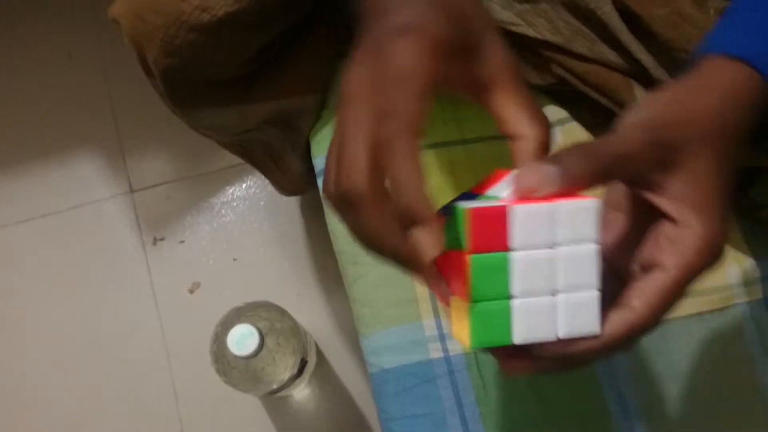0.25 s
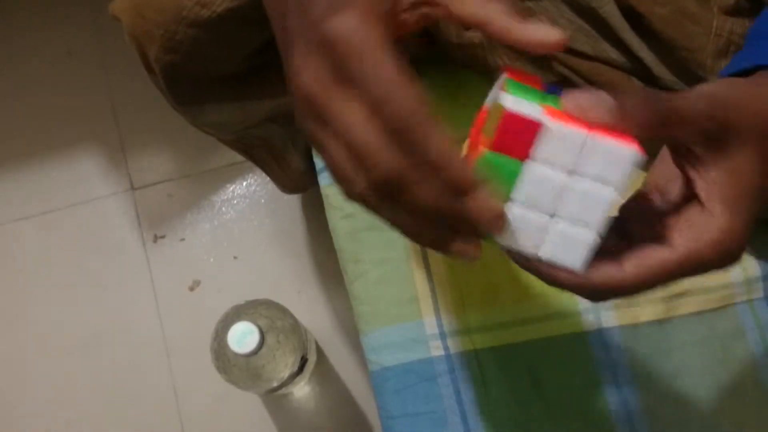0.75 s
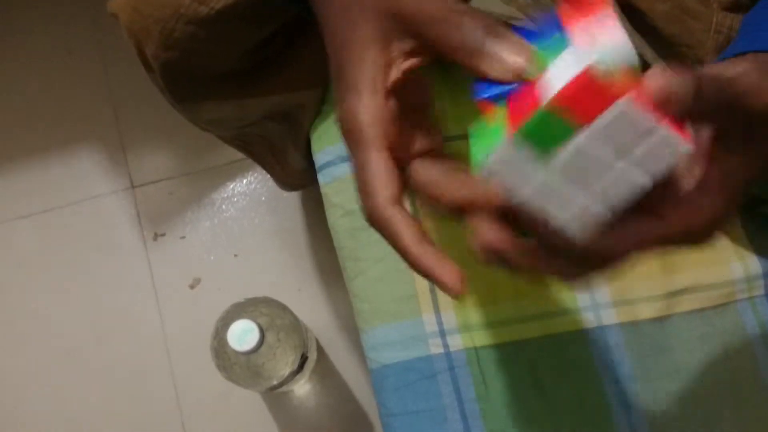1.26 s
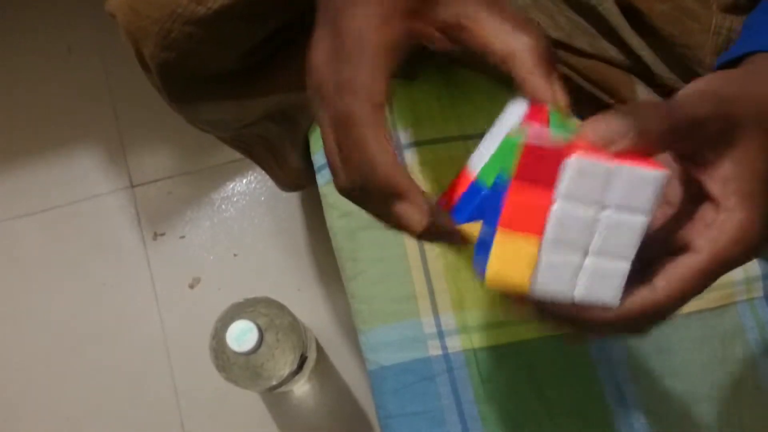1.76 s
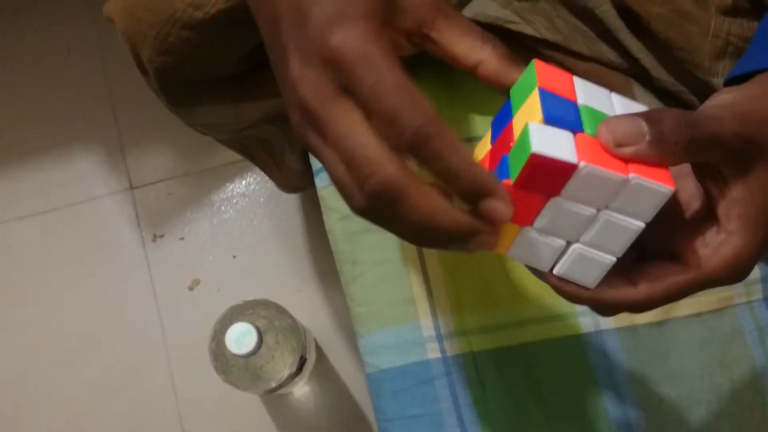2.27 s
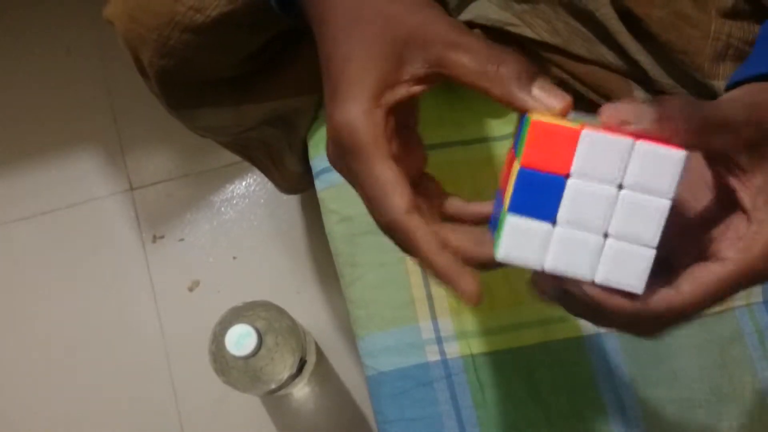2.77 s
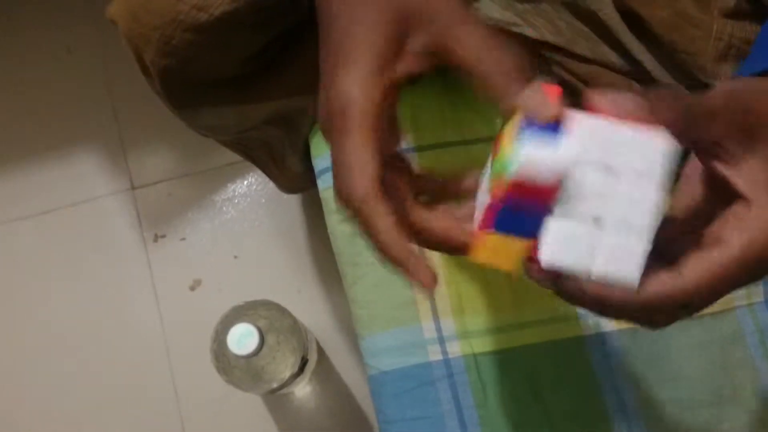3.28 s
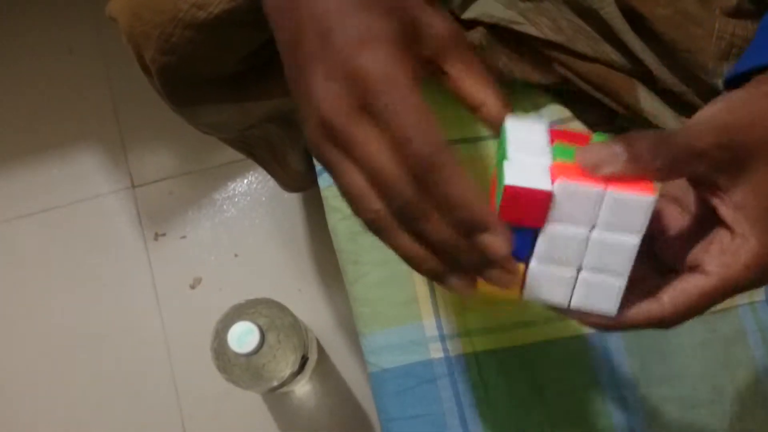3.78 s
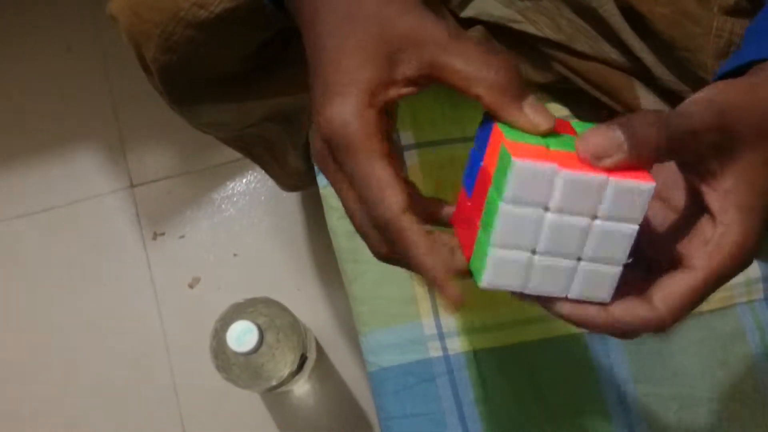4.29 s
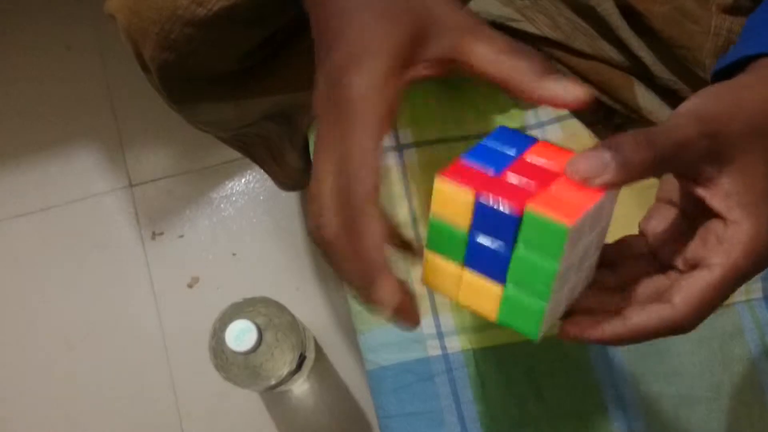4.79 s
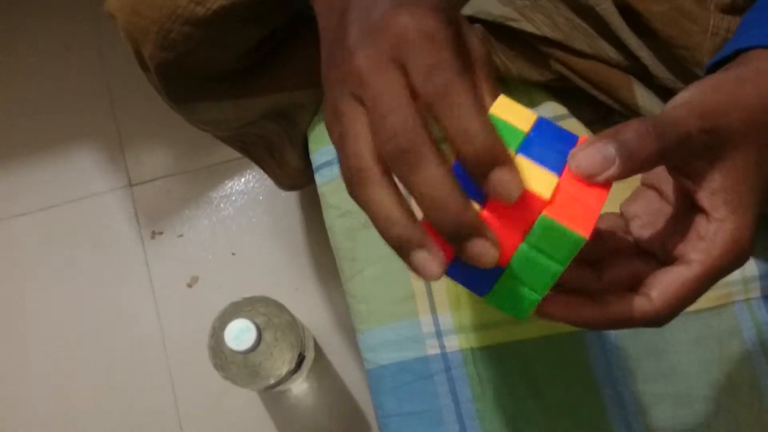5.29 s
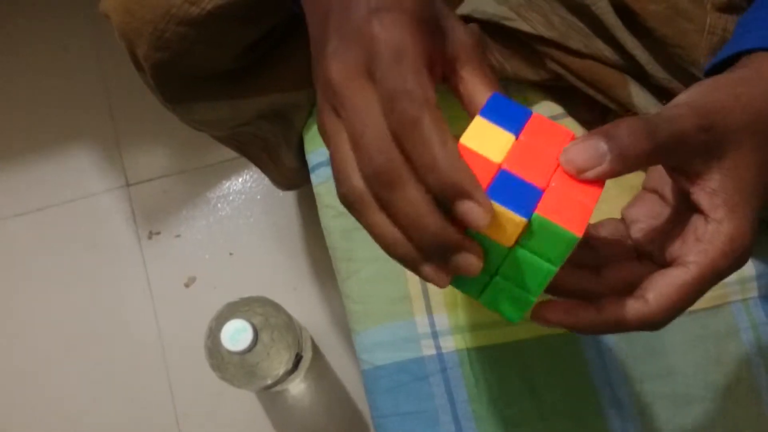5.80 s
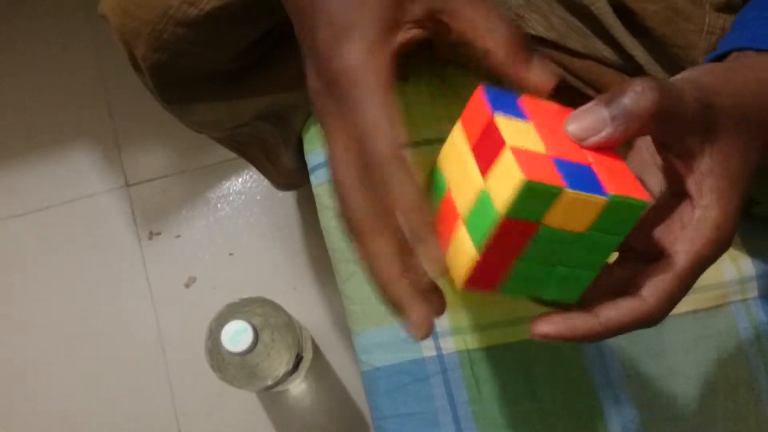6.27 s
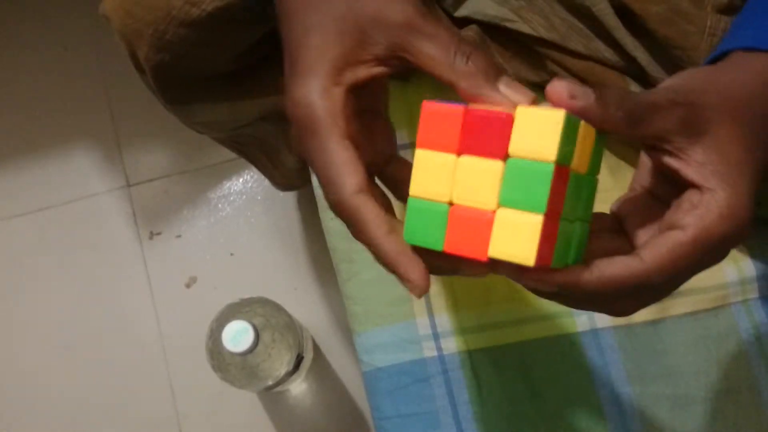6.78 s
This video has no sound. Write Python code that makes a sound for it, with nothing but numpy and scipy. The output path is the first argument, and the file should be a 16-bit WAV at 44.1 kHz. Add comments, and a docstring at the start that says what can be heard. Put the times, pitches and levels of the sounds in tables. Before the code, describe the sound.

A plastic puzzle cube is twisted quickly by hand up close, with dry rasps, irregular light clicks and two sharp louder clacks in a small room.

```python
"""In a small tiled room, a plastic puzzle cube is twisted quickly by hand, close to the microphone.
Its layers rasp as they slide: banded noise roughened by chance grains. The hollow pieces tick, catch
and twice snap into line with a loud clack: noise cracks with short rings, echoed by a decaying noise tail.
A low hum of three wavering partials swells and fades over the room's rumble of filtered noise,
and a few soft bumps, heavily damped sines, reach the microphone."""
import sys
import numpy as np
from scipy import signal
from scipy.io import wavfile

SR = 44100
rng = np.random.default_rng(int(sys.argv[2]) if len(sys.argv) > 2 else 0)


def master(y):
    """Save y as 16-bit WAV."""
    cut = np.clip(np.atleast_2d(y).T, -1, 1)
    pcm = np.round(cut * 32767)  # scale
    wavfile.write(sys.argv[1], SR, pcm.astype(np.int16))


N = 310464
TIME = np.arange(N) / SR

# pushes on a layer, free-running bright and pressed dull:
# start_s, length_s, level_db (before the rasp trim), tilt_db_per_octave
LAYER_PUSHES = [(0.0, 0.02, -53, 1), (0.1, 0.22, -62.5, 1.5), (0.275, 0.14, -51, 1.5),
                (0.49, 0.044, -64, -1), (0.65, 0.038, -60.5, 4.5), (0.72, 0.041, -53.5, 0.5),
                (0.991, .1, -49.5, 1.3), (1.252, 0.042, -61.5, -3), (1.323, .06, -48, -1),
                (1.479, .025, -60, 3), (1.72, 0.032, -52.5, 3), (1.76, .045, -46.5, 1.2),
                (1.928, .08, -48, 1.5), (2.148, .02, -56.5, 0), (2.225, 0.042, -53, 0),
                (2.39, 0.13, -54, -0.1), (2.633, .025, -37.5, 0), (2.866, .035, -54.5, 0),
                (2.955, 0.041, -43, -.2), (3.125, 0.051, -59, .5), (3.332, 0.054, -49, .3),
                (3.385, .06, -42.5, 0.8), (3.535, .085, -50, .7), (3.70, 0.018, -58.5, 0),
                (3.86, 0.16, -47, -2), (4.615, 0.045, -52, .9), (4.675, .045, -47.5, .9),
                (4.825, 0.0086, -56.5, 0), (5.043, .05, -47, 1), (5.32, 0.11, -62, 0),
                (5.63, 0.044, -58, .7), (5.69, 0.022, -46, .7), (6.14, 0.13, -64.5, 0),
                (6.46, .04, -59.5, -1), (6.69, .09, -64.5, -1.3)]
GRIP_DB = -72.5   # fingers brush the smooth faces all the time; before the rasp trim


def from_db(db):
    """Decibels to gain."""
    return 10 ** (np.asarray(db) / 20)


def rms_one(x):
    """Scale to unit power."""
    return x / np.sqrt(np.mean(x ** 2) + 1e-20)


def at_hz(points, hz):
    """Read a table on a log-frequency axis."""
    freqs, values = np.transpose(points)
    return np.interp(np.log(hz), np.log(freqs), values)


def butter(x, hz, kind, order=2):
    """Causal Butterworth filter."""
    return signal.sosfilt(signal.butter(order, hz, kind, fs=SR, output="sos"), x)


def pan(left_db):
    """Gains of the two channels, left_db apart."""
    return from_db(np.array([[left_db], [-left_db]]) / 2)


def drift(rate):
    """Slow chance: straight lines between random points, rate of them per second."""
    knots = rng.standard_normal(int(rate * N / SR) + 2)
    return np.interp(TIME * rate, np.arange(len(knots)), knots)


def add(out, s, sound):
    """Mix a stereo sound in at time s."""
    start = max(round(s * SR), 0)
    out[:, start:start + sound.shape[1]] += sound[:, :N - start]


def noise_bands(size, low_hz):
    """Roughly half-octave bands of stereo noise, most alike left and right in the bass: (Hz, band)."""
    # likeness of the two channels: pitch_hz, correlation (0 to 1)
    likeness = [(30, 1), (200, 0.51), (600, 0), (1500, 0.01), (4000, 0), (16000, 0.32)]
    edges = np.geomspace(low_hz, 17000, int(2 * np.log2(17000 / low_hz)) + 1)
    white = rng.standard_normal((2, 2, size))
    for k, (low, high) in enumerate(zip(edges, edges[1:])):
        mid, side = butter(white[k % 2], [low, high], "band")
        hz = np.sqrt(low * high)
        alike = np.clip(at_hz(likeness, hz), -1, 1)
        yield hz, np.sqrt(1 + alike) * mid + np.sqrt(1 - alike) * side * [[1], [-1]]


def air(air_db=-67, sway_db=-47, sway_hz=11):
    """Steady room noise, and the deep sway of a hand-held microphone."""
    # colour of the still room: pitch_hz, relative level_db_per_hz
    air_colour = [(20, -9.5), (40, -11.5), (80, -16.5), (130, -20), (210, -22), (300, -26), (420, -27.5),
                  (600, -34), (1000, -38), (2000, -40), (4000, -47), (8000, -57), (16000, -49.5)]
    # its stereo balance: pitch_hz, left_right_db
    air_balance = [(25, -26.5), (100, -3.5), (250, -0.5), (5000, -2), (8500, -11), (16000, -9.5)]
    noise = 0
    for hz, band in noise_bands(N, 20):
        noise = noise + from_db(at_hz(air_colour, hz)) * pan(at_hz(air_balance, hz)) * band
    # air_db sets the level above the rumble
    noise = noise / np.std(butter(noise.mean(axis=0), 150, "high", order=4))
    sway = rms_one(butter(rng.standard_normal(N), sway_hz, "low", order=3))
    return from_db(air_db) * noise + from_db(sway_db) * sway * pan(-11.5)


def hum(centre_hz=63, hum_db=-1, waver=0.022):
    """A low hum that wavers in pitch as it swells and fades."""
    # swells of the hum: time_s, level_db (before the hum_db trim)
    hum_swells = [(0.0, -49.5), (0.13, -58.5), (0.28, -48), (0.62, -55.5), (1.05, -73), (1.55, -54),
                  (1.66, -72), (1.82, -56), (2.05, -66.5), (2.39, -47), (2.72, -68.5), (3.9, -60.5),
                  (4.16, -48), (4.33, -57.5), (4.52, -52), (4.7, -62), (5.15, -59.5), (5.25, -43),
                  (5.42, -45), (5.65, -60), (6.6, -66.5), (6.76, -55), (7.04, -43)]
    # partials: multiple of the hum's pitch, relative level_db
    hum_partials = [(1, 9), (2, -13), (3, -16)]
    pitch_hz = centre_hz * (1 + waver * drift(3.5))
    phase = 2 * np.pi * np.cumsum(pitch_hz) / SR
    tone = sum(from_db(db) * np.sin(round(k) * phase) for k, db in hum_partials)
    level_db = np.interp(TIME, *np.transpose(hum_swells)) + hum_db
    return from_db(level_db) * rms_one(tone) * pan(-7.5)


def sliding(attack_s=0.0091, release_s=0.022, grip_tilt_db=1):
    """Level and tilt of the rasp: a layer gathers speed, holds over its travel, then is braked."""
    power, tilted = 0, 0
    for start, length, db, tilt in LAYER_PUSHES:
        early = np.maximum(start - TIME, 0)
        late = np.maximum(TIME - start - length, 0)
        swell = np.exp(-np.minimum(early / attack_s + late / release_s, 20))
        push = (from_db(db) * swell) ** 2
        power, tilted = power + push, tilted + tilt * push
    grip = from_db(GRIP_DB) ** 2
    # the loudest push or grip decides the tilt, in dB per octave
    return np.sqrt(power), (tilted + grip_tilt_db * grip) / (power + grip)


def rasp(rasp_db=-4.5, judder_db=2.5, left_db=3.0, slips_per_s=520, slip_spread_db=4.0):
    """Sliding plastic sticks and slips in many tiny grains over the smooth hiss of the fingers."""
    # colour of the rasp: pitch_hz, relative level_db_per_hz
    rasp_colour = [(300, -21.5), (600, -7), (900, -0.5), (1600, 3), (2400, 3), (3500, 3), (6000, -2.5),
                   (9000, -2), (12000, 4), (16000, 1)]
    level, tilt = sliding()
    level = level * from_db(judder_db * drift(70))
    slips = rng.random(N) < slips_per_s / SR
    slips = slips * from_db(slip_spread_db * np.minimum(rng.exponential(1, N), 3))
    grains = rms_one(butter(slips + 1e-18, 200, "low", order=1))
    grit = rms_one(grains + .4)   # a steady part fills in between the grains
    hiss = 0
    for hz, band in noise_bands(N, 300):
        hiss = hiss + from_db(at_hz(rasp_colour, hz) + tilt * np.log2(hz / 5000)) * band
    return from_db(rasp_db) * (level * grit + from_db(GRIP_DB)) * rms_one(hiss) * pan(left_db)


def loose_ticks(count=2, tick_db=-2.5, spread_db=2.5, hollow_db=-6.5, top_db=-1):
    """Loose pieces tick at chance moments of each push: start_s, level_db, hollow_db, top_db."""
    ticks = []
    for start, length, db, _ in LAYER_PUSHES:
        for _ in range(count):
            when = start + length * rng.random()
            level_db = db + tick_db + spread_db * rng.standard_normal()
            ticks.append((when, level_db, hollow_db, top_db))
    return ticks


def knock(crack_s=0.001, rise_s=0.00014, far_crack_s=0.0015, far_rise_s=0.0035, far_db=0,
          scatter_db=-20, scatter_s=0.012, vary_db=3.0, detune=0.05):
    """One contact: a crack, its scatter between the hands, and a short ring varied for piece size."""
    # rings of hollow plastic damped by the hands, before variation: pitch_hz, level_db, t60_s
    cube_modes = [(915, -19.5, 0.023), (1018, -23, 0.014), (1350, -21, .018), (1626, -17, 0.022),
                  (2140, -21, 0.025), (2900, -26, 0.018), (3736, -25, 0.043), (4620, -17, 0.0084),
                  (5376, -16.5, 0.013), (6290, -15, 0.01), (8100, -16, 0.0034), (8400, -12.5, 0.0041),
                  (9430, -10, 0.0061)]
    t = np.arange(SR // 25) / SR
    near = np.exp(-t / crack_s)
    # the right port faces away
    far = from_db(far_db) * np.exp(-t / far_crack_s) * (1 - np.exp(-t / far_rise_s))
    scatter = from_db(scatter_db) * np.exp(-t / scatter_s)
    sound = rng.standard_normal((2, len(t))) * (np.array([near, far]) + scatter)
    chances = rng.standard_normal((len(cube_modes), 3))
    for (hz, db, t60), (strength, size, lag) in zip(cube_modes, chances):
        ear_time = t - np.array([[0], [lag * .00007]])
        phase = 2 * np.pi * hz * (1 + detune * size) * ear_time
        decay = from_db(db + vary_db * strength - 60 * t / t60)
        sound += decay * np.sin(phase + rng.uniform(0, 2 * np.pi))
    return sound * (1 - np.exp(-t / rise_s))


def clicks(knock_db=-2, hollow_db=0, top_db=-3.0, slip_db=-17, slip_s=0.0021, across=0.31):
    """A piece scuffs, then lands; where it meets its neighbour sets its share of hollow body and sharp top."""
    # pieces knocking together, all levels before the trims above:
    # start_s, level_db of the onset, hollow_db and top_db (relative to the middle band)
    piece_knocks = [(0.174, -46, -2, 8), (0.268, -45.5, -3, -2), (0.294, -39, -11, 13), (0.308, -42, 3, 37),
                    (0.349, -44, -11, 3.5), (0.498, -45, -11, 9.5), (0.530, -49, -8, 1),
                    (0.567, -51.5, -9, 5), (0.889, -48.5, -12, 0), (0.980, -40.5, -10.5, 3),
                    (0.999, -39, -7, 2), (1.009, -43.5, -2.5, -15), (1.0609, -28, -12.5, 2.5),
                    (1.169, -53, -4, 1), (1.257, -42.5, -20, 11.5), (1.315, -43.5, -1, 8),
                    (1.3525, -33, -14, 6), (1.3646, -37, -6, 7), (1.3695, -36, -15, 6.5),
                    (1.473, -55.5, -5.5, -1), (1.594, -47, -4.5, 2.5), (1.681, -42.5, -18, 8),
                    (1.7067, -51, -6, 2), (1.900, -33.5, -8, 15), (1.9322, -28.5, -15.5, 6),
                    (2.064, -47, -9, 4), (2.0901, -43.5, -6, 6), (2.205, -38.5, -15.5, 3.5),
                    (2.264, -67, -11, 16), (2.368, -42, -9, 4.5), (2.380, -33, -15, 11.5),
                    (2.404, -38, -16, 5.5), (2.424, -41, -6, 12), (2.456, -47, -7, -3),
                    (2.476, -37.5, -10, 5.5), (2.569, -38, -13, 9.5), (2.585, -36.5, -17, 6),
                    (2.609, -14, -15.5, 4.5), (2.6247, -25, -18, 10), (2.632, -12.5, -8.5, 11.5),
                    (2.6345, -12, -9, 7.5), (2.646, -10, -11.5, 8.5), (2.6498, -19, -26, 1),
                    (2.860, -49, -15, -2), (2.921, -45, -22, 7), (2.956, -39.5, -4, -2),
                    (2.9803, -27.5, -16, 7), (2.9999, -32, 3.5, 16), (3.087, -43, -10, 6.5),
                    (3.295, -39.5, -6.5, 4.5), (3.3484, -33.5, -5.5, 0.5), (3.400, -35.5, -20, 1),
                    (3.4283, -28, -15, 7), (3.4512, -26.5, -9.5, 8), (3.498, -45, -5, 22),
                    (3.5318, -41.5, -11, 1), (3.548, -44, -7, -16), (3.715, -50, -19, 12),
                    (3.774, -48, -7, 4.5), (3.839, -48, -9, 5), (3.844, -36, -12, 7),
                    (3.866, -41, -25, -11), (3.874, -38, -13, 1), (3.9272, -26, -13.5, 6.5),
                    (3.9301, -23, -18, 15), (3.94, -24.5, -13, 2), (3.9513, -18.5, -20, 4.5),
                    (3.9522, -20.5, -37, 2), (4.020, -38, -5, 12), (4.128, -55.5, -15, -5),
                    (4.172, -50.5, -6, 3), (4.213, -47, -1.5, 7.5), (4.256, -49.5, -11, 3),
                    (4.317, -45, -14, 3), (4.364, -53, -1, 10), (4.397, -48.5, -11, -2),
                    (4.417, -39.5, -13.5, 7.5), (4.58, -50, -10, -5), (4.616, -45, -1.5, -7),
                    (4.694, -36, -7.5, 2.5), (4.818, -47.5, -15.5, 4), (5.007, -45.5, -10, 2.5),
                    (5.0303, -43.5, -24, 4), (5.061, -31.5, -11.5, -10), (5.0967, -26, -9, 2.5),
                    (5.275, -51, -12, 4.5), (5.309, -46.5, -10, 6.5), (5.394, -44.5, -13, 1.5),
                    (5.625, -49, -7, 2.5), (5.64, -45.5, -11, 0), (5.7027, -29, -10.5, 6.5),
                    (5.920, -47.5, -20, 14), (5.945, -54, -11, 0.5), (6.0927, -56, -6, 2),
                    (6.142, -52.5, -15, 5), (6.161, -51, -12, 0), (6.193, -42.5, -9.5, 7.5),
                    (6.239, -44, -18, 2), (6.260, -47.5, -12, 0.5), (6.356, -44.5, -10, 8),
                    (6.379, -49, -9, 6), (6.460, -48, -7, 5), (6.529, -48, -6.5, 4),
                    (6.576, -42.5, -14, 11), (6.634, -50.5, -14, 4), (6.672, -46, -9, 2.5),
                    (6.711, -54.5, -12, 3), (6.7545, -49, -18, 3.5), (6.803, -48.5, -12.5, 0),
                    (6.984, -47, -12, 2.5), (6.994, -44.5, -8, 4.5)]
    out = np.zeros((2, N))
    lead = np.arange(-SR // 150, 0) / SR
    for s, db, hollow, top in piece_knocks + loose_ticks():
        scuff = from_db(slip_db) * np.exp(lead / slip_s) * rng.standard_normal((2, len(lead)))
        contact = np.hstack([scuff, knock()])
        body = butter(contact, [650, 2400], "band", order=3)
        middle = butter(contact, [2700, 7200], "band", order=3)
        edge = butter(contact, [7000, 16500], "band", order=3)
        body = body + across * body[::-1]   # long waves reach both ports more alike
        sound = from_db(hollow + hollow_db) * rms_one(body) + rms_one(middle)
        sound = sound + from_db(top + top_db) * rms_one(edge)
        onset = sound[:, len(lead):len(lead) + SR // 440]
        onset_level = np.sqrt(np.mean(onset ** 2))
        add(out, s + lead[0], sound / onset_level * from_db(db + knock_db))
    return out


def body_thud(knocks, thud_db=-13, low_hz=190, high_hz=800):
    """Knocks also shake the whole cube in the hand: low noise follows their loudness."""
    shake = np.sqrt(np.abs(butter(knocks.mean(axis=0) ** 2, 60, "low", order=1)))
    return from_db(thud_db) * butter(shake * rng.standard_normal(N), [low_hz, high_hz], "band")


def room(x, wet_db=-10.0, first_s=0.0047, build_s=0.0036, left_db=-5.5, lumpy_db=5.5):
    """Reflections build up unevenly from the floor and walls, then die away, the top soonest."""
    # colour of the reverberation: pitch_hz, relative level_db_per_hz
    room_colour = [(300, -0.5), (1000, 3), (3000, 0.5), (4500, 7.5), (6000, 4.5), (8500, 1.5), (15000, 7.5)]
    # its decay: pitch_hz, t60_s
    room_decay = [(500, 0.1), (1500, 0.27), (4000, 0.21), (9000, 0.19), (15000, 0.07)]
    t = np.arange(SR // 2) / SR
    tail = 0
    for hz, band in noise_bands(len(t), 140):
        tail = tail + band * from_db(at_hz(room_colour, hz) - 60 * t / at_hz(room_decay, hz))
    build = np.clip((t - first_s) / build_s, 0, 1)
    tail = tail * build * from_db(lumpy_db * drift(700)[:len(t)])
    tail = tail / np.sqrt(np.sum(tail ** 2) / 2)
    return from_db(wet_db) * signal.fftconvolve(x, tail, axes=1)[:, :N] * pan(left_db)


def port(x, resonances):
    """A microphone port lifts and hollows parts of the treble with peaking filters."""
    for hz, width, db in resonances:
        w, gain = 2 * np.pi * hz / SR, from_db(db / 2)
        damp = np.tan(np.pi * width / SR)
        zeros = [1 + damp * gain, -2 * np.cos(w), 1 - damp * gain]
        poles = [1 + damp / gain, -2 * np.cos(w), 1 - damp / gain]
        x = signal.lfilter(zeros, poles, x)
    return x


def bumps(cycles=2.44, rise_s=0.0018):
    """Each bump is a dull, damped swing of the microphone's body that falls 60 dB in a few cycles."""
    # soft bumps: start_s, level_db (before rise and decay), pitch_hz, left_right_db
    soft_bumps = [(0.624, -30, 110, -22.5), (0.628, -45, 280, -12), (4.994, -32, 420, -19),
                  (5.530, -35.5, 126.3, -23.5)]
    out, t = np.zeros((2, N)), np.arange(SR // 10) / SR
    for s, db, hz, left_db in soft_bumps:
        envelope = from_db(db - 60 * t * hz / cycles) * (1 - np.exp(-t / rise_s))
        add(out, s, -pan(left_db) * envelope * np.sin(2 * np.pi * hz * t))
    return out


def scene(lag_samples=2, hiss_db=-78):
    """The cube and its room through two ports, the left slightly later, over the low background."""
    # resonances of the two microphone ports: pitch_hz, width_hz, gain_db
    left_port = [(2540, 296, -6), (8480, 1970, 10), (11640, 1400, -5), (13400, 800, 9), (15460, 1970, -27)]
    # pitch_hz, width_hz, gain_db
    right_port = [(2560, 2700, -1.5), (6045, 1700, 9.5), (10420, 2800, -10.5), (14310, 5200, -15)]
    knocks = clicks()
    cube = knocks + body_thud(knocks) + rasp()
    left, right = cube + room(cube) + air()
    heard = np.array([port(np.roll(left, lag_samples), left_port), port(right, right_port)])
    hiss = from_db(hiss_db) * rng.standard_normal((2, N))   # the microphones' own even hiss
    return heard + bumps() + hum() + hiss


def record(dry, ceiling=0.66, cutoff_hz=15800):
    """The highest peaks are rounded off and the top is cut steeply."""
    rounded = dry / (1 + (dry / ceiling) ** 6) ** (1 / 6)
    return signal.sosfilt(signal.ellip(10, .1, 80, cutoff_hz, fs=SR, output="sos"), rounded)


dry = scene()
out = record(dry)
master(out)
```